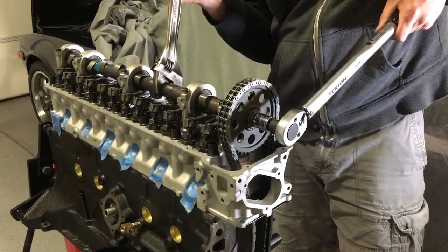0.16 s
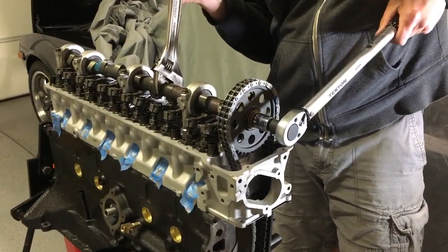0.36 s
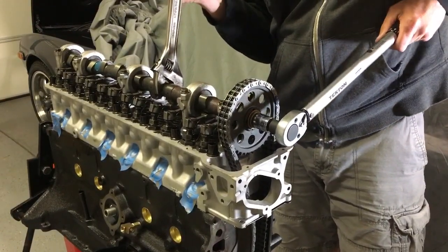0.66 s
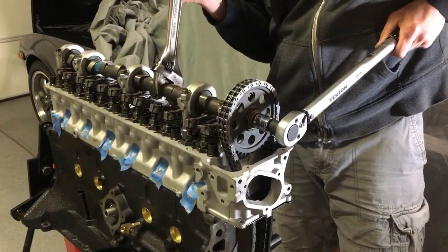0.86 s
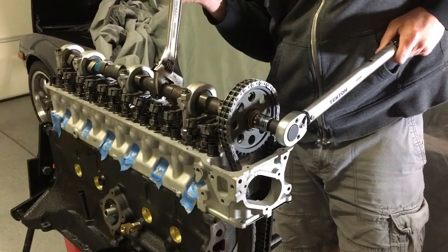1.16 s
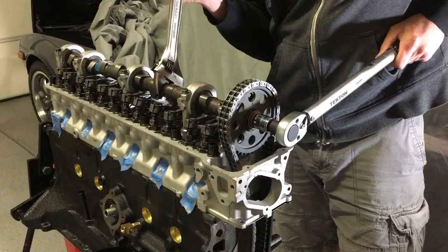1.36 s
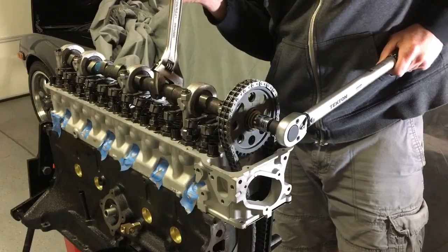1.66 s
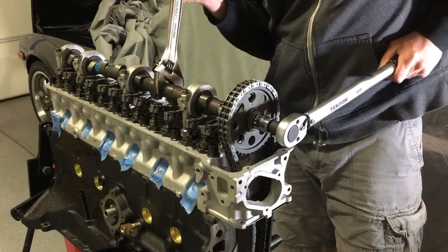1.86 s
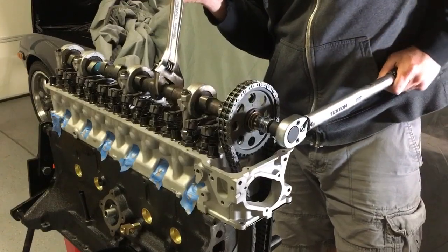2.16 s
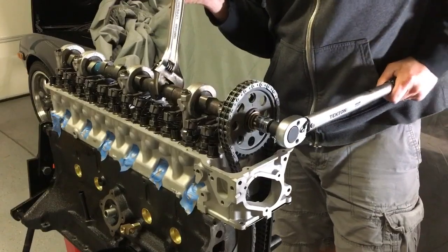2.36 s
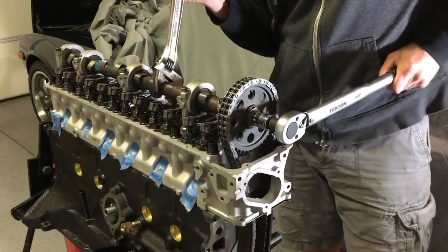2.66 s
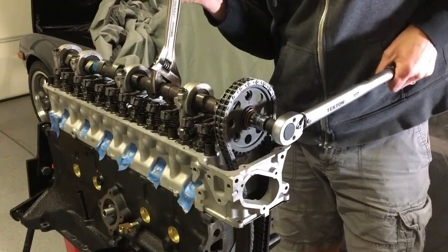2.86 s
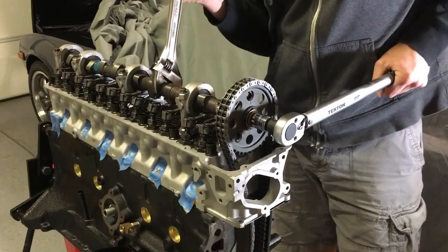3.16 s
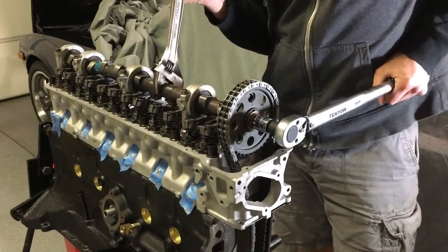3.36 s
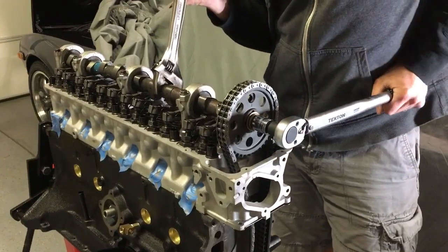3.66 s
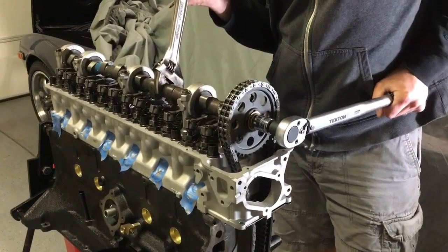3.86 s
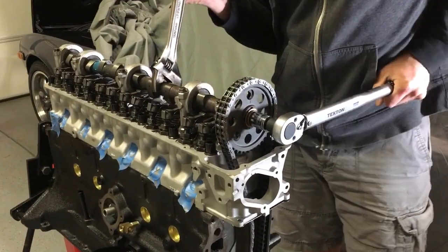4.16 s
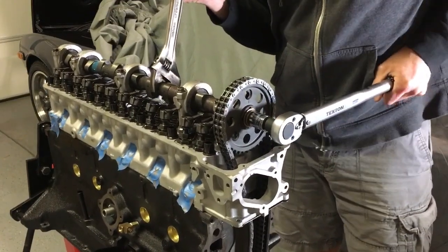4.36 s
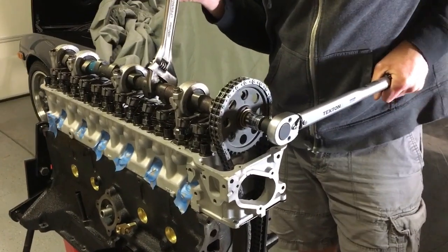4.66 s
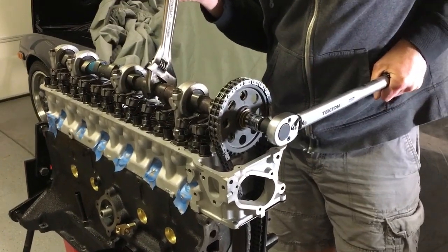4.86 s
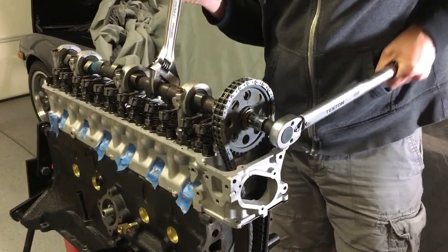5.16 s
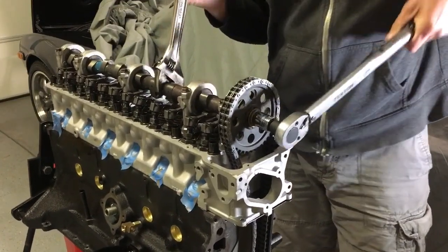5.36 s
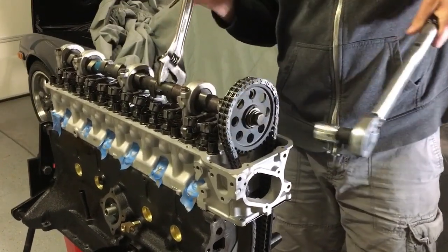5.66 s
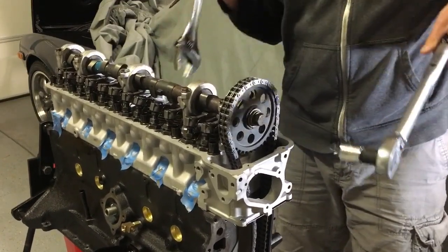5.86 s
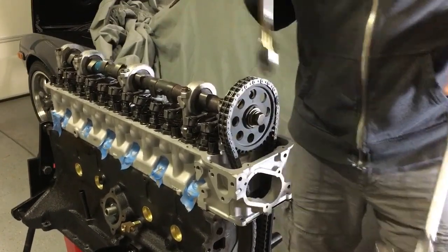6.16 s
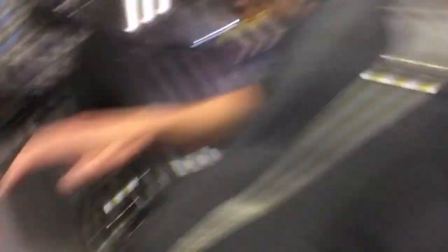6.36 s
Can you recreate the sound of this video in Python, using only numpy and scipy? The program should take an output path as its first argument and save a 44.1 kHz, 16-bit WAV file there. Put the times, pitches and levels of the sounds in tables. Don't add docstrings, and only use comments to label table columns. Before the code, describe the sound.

A quiet, hard-walled workshop heard by a close microphone: faint low mains hum, soft hiss and deep air rumble. From 0 to 2.1 s only tiny dull knocks, ticks, creaks and light sleeve rubs of tools under load. At 2.26 s a torque wrench snaps over: an extremely loud, bright, clipped steel crack with quick echoes and roughly half a second of metallic room ring. A small knock at 2.45 s leads to a slightly softer, ringing reset click at 2.65 s. Quiet again, until a short clear spanner slip at 3.67 s, the second huge crack at 3.82 s and its reset at 4.13 s. Faint dragging follows around 4.5-4.9 s. From 5.2 to 5.8 s socket and spanner come off with scuffs, scrapes, rustling cloth and small bright clinks. At 6.26 s the sound dips momentarily; soft low thumps and a strong pressure bump on the microphone at 6.47 s finish it.

```python
import sys
import numpy as np
from scipy import signal
from scipy.fft import rfft, irfft
from scipy.io import wavfile

SR = 44100
rng = np.random.default_rng(int(sys.argv[2]) if len(sys.argv) > 2 else 0)


def rack_gain(trim_db):
    fader = np.asarray(trim_db, float)
    return 10 ** (fader / 20)


def materialize(psi):
    bounded = np.clip(np.atleast_2d(psi).T, -1, 1)
    quanta = np.round(bounded * 32767).astype(np.int16)
    wavfile.write(sys.argv[1], SR, quanta)


N = 286806
TIME = np.arange(N) / SR


def noise(n=N):
    return rng.standard_normal(n)


def filtered(x, order, hz, kind="low"):
    return signal.sosfilt(signal.butter(order, hz, kind, fs=SR, output="sos"), x)


def at_hz(points, hz):
    points = np.array(points)
    return np.interp(np.log(hz + 1), np.log(points[:, 0]), points[:, 1])


def rms_one(x):
    return x / np.sqrt(np.mean(x ** 2) + 1e-20)


def peak_one(x):
    return x / np.abs(x).max()


def energy_one(x):
    return x / np.sqrt(np.sum(x ** 2))


def colour(x, spectrum, size=16384):
    cepstrum = irfft(np.log(rack_gain(at_hz(spectrum, np.arange(size // 2 + 1) * SR / size))))
    cepstrum[1:size // 2] *= 2
    cepstrum[size // 2 + 1:] = 0
    response = irfft(np.exp(rfft(cepstrum)))
    return signal.fftconvolve(x, response)[:len(x)]


def ring(clicks, hz, t60):
    r, w = rack_gain(-60 / (t60 * SR)), 2 * np.pi * hz / SR
    return signal.lfilter([0, np.sin(w)], [1, -2 * r * np.cos(w), r * r], clicks + 1e-18)


def struck(modes, levels_db, spread):
    blow = 1. * (np.arange(SR // 2) == 0)
    wide = np.minimum(np.array(modes)[:, :1] / 2500, 1)
    detune = 1 + spread * wide * rng.uniform(-1, 1, (len(modes), 4))
    out = 0
    for (hz, db, t60), more_db, factors in zip(modes, levels_db, detune):
        group = sum(ring(blow, hz * d, t60 * (2 * d - 1) ** 20) for d in factors)
        out = out + rack_gain(db + more_db) * group
    return out


def drift(rate):
    r = np.exp(-80 * np.pi * rate / SR)
    slow = signal.lfilter([1], [1, -2 * r, r * r], noise(N // 40 + 4002))[4000:]
    return np.interp(np.arange(N) / 40, np.arange(len(slow)), rms_one(slow))


def strokes(rows, rest_db=-110):
    levels_db = [db - 10 * np.where(TIME < s, (s - TIME) / rise, (TIME - s) / fall)
                 for s, db, rise, fall in rows]
    return rack_gain(np.maximum(rest_db, np.max(levels_db, axis=0)))


def add(out, s, sound):
    i = round(s * SR)
    out[i:i + len(sound)] += sound[:N - i]


# (frequency [Hz], level [dB])
PORT_RESPONSE = [(7600, 0), (8800, 0), (10000, 0), (11300, 4), (13000, -3), (14800, -3), (15650, 6.5),
                 (16300, -6)]


def snaps(events, spectra, modes, lines, rise_s, rattle_s, ring_db, crack_hz, send_db):
    out, t = np.zeros((2, N)), np.arange(SR // 2) / SR
    click = 1. * (t == 0)
    swell = 1 - np.exp(-(t / .0006) ** 2)
    for (s, db, *echoes_db), spectrum in zip(events, spectra):
        body = rack_gain(ring_db) * energy_one(struck(modes, np.zeros(len(modes)), spread=0.013))
        clear = sum(rack_gain(line_db - 20) * ring(click, hz, t60) for hz, line_db, t60 in lines)
        shape = (1 - np.exp(-(t / rise_s) ** 2)) * np.exp(-t / rattle_s)
        crack = colour(shape * noise(len(t)), spectrum)
        crack = filtered(crack, 2, crack_hz, "high")
        direct = rack_gain(db) * (peak_one(crack) + swell * (3.0 * body + clear))
        add(out[0], s - rise_s, direct)
        dull = filtered(direct, 2, 8000)
        for lag_s, echo_db in zip((.0057, .0082, .0168), echoes_db + [-10]):
            add(out[0], s - rise_s + lag_s, rack_gain(echo_db) * dull)
        whole = energy_one(colour(click, spectrum)) + body
        add(out[1], s, rack_gain(db + send_db) * whole)
    return np.array([colour(x, PORT_RESPONSE) for x in out])


# (time [s], peak [dB], first echo [dB], second echo [dB])
BREAKS = [
    (2.2582, 5, -6, -4),
    (3.8189, 5, -3, -7),
]
# (frequency [Hz], level [dB per Hz])
CLICK_SPECTRA = [
    [(88, -64.5), (150, -38), (226, -16), (345, 1.5), (470, -17), (600, -11), (760, -18), (1000, -9),
     (1270, -11), (1490, -10), (1640, -17), (3000, -8), (3600, -6), (4050, 2), (4400, -1), (4830, -5.5),
     (7150, -4.5), (9790, -12.5), (16300, -26.5)],
    [(88, -55.5), (150, -28), (292, -9), (516, -15.5), (967, -7), (1250, -11), (1520, -6), (1740, -11.5),
     (2300, -12), (2700, -6), (3500, -7), (4150, 0), (4800, -6), (6480, -6.5), (7150, -3), (7890, -9),
     (16300, -25.5)],
    [(88, -66.5), (150, -40), (270, -7), (516, -24.5), (581, -9), (640, -24), (948, -12), (1070, -23.5),
     (1150, -18.5), (1450, -8), (1900, -17), (3300, -13), (3700, -7), (4150, -4), (4600, -10), (5020, -10),
     (8500, -12), (16300, -32)],
    [(88, -66), (150, -39), (290, -8), (506, -19.5), (581, -5.5), (640, -20), (1000, -12), (1400, -5),
     (1800, -13), (2580, -12), (3300, -12), (3650, -6), (4200, -4), (4600, -8), (5020, -10.5), (7290, -8),
     (8040, -14), (16300, -34)],
]
# (frequency [Hz], level [dB], t60 [s])
BREAK_MODES = [(235, -22, .35), (340, -15, .18), (2560, -8, .15), (2960, -10, .15), (4020, -2, .12),
               (4150, -1, .2), (4330, -6, .08), (5430, -7, .05), (6300, -16, 0.3), (7550, -11, .1),
               (7110, -1.5, 0.2), (8750, -8, .07), (11210, -12, .04), (15600, -17, .1)]
# (frequency [Hz], level [dB], t60 [s])
BREAK_LINES = [(2660, -22, .3), (3000, -22, .3), (3997, -18, .3), (4128, -22, .5), (5640, -25, .3),
               (6288, -27, .7), (7120, -22, .3), (6960, -24, .3), (7890, -27, .3), (8850, -26, .2),
               (15700, -30, .15)]


def break_overs():
    return snaps(BREAKS, CLICK_SPECTRA[:2], BREAK_MODES, BREAK_LINES, rise_s=.0003, rattle_s=.0023,
                 ring_db=-7, crack_hz=2800, send_db=10.5)


# (time [s], peak [dB], first echo [dB], second echo [dB])
RESETS = [
    (2.6550, 2, -7, -8),
    (4.1333, 2.5, -5, -7),
]
# (frequency [Hz], level [dB], t60 [s])
RESET_MODES = [(230.9, -23.5, 0.36), (586, -18.5, 0.4), (1440, -3, .05), (3640, -3, .12), (4110, 1, .25),
               (3820, -4, .15), (4250, 0, 0.14), (4490, -4, .14), (5500, -9.5, 0.18), (7000, -9, .1),
               (7150, -3, .2), (7250, -3, .26), (10600, -11, 0.08)]
# (frequency [Hz], level [dB], t60 [s])
RESET_LINES = [(2760, -22, .4), (3580, -22, .3), (4230, -22, .4), (4340, -23, .4), (4460, -22, .5),
               (5604, -22, .35), (7170, -28, .5), (7270, -28, .5), (15500, -27, .15), (15720, -29, .15)]


def resets():
    return snaps(RESETS, CLICK_SPECTRA[2:], RESET_MODES, RESET_LINES, rise_s=.0004, rattle_s=.0019,
                 ring_db=-6, crack_hz=2000, send_db=11.5)


# (time [s], peak [dB], first echo [dB], second echo [dB])
SLIPS = [
    (3.6677, -11, -20, -12),
]
# (frequency [Hz], level [dB per Hz])
SLIP_SPECTRUM = [(88, -43), (150, -14), (612, -9), (850, -13), (1250, 0.5), (1980, -21.5), (2270, -13),
                 (2920, -1), (4300, -8), (5500, -18), (7920, -25), (9500, -29), (13000, -30), (16000, -38)]
# (frequency [Hz], level [dB], t60 [s])
SLIP_MODES = [(1020, -8, .1), (1180, -10, .1), (1300, -7, .08), (2335, -7, .3), (2550, -10, .1),
              (2879, -3, .08), (2970, -4, .2), (3650, -8, .08), (4100, -8, .08)]
# (frequency [Hz], level [dB], t60 [s])
SLIP_LINES = [(2341, -9, .45), (2540, -13, .3), (2963, -9, .35)]


def spanner_slip():
    return snaps(SLIPS, [SLIP_SPECTRUM], SLIP_MODES, SLIP_LINES, rise_s=.00003, rattle_s=.00005,
                 ring_db=-12, crack_hz=500, send_db=8.0)


def touches(events, modes, tick_db, ring_db):
    out, t = np.zeros(N), np.arange(SR // 2) / SR
    octaves = np.log2(np.array(modes)[:, 0] / 6000)
    for s, db, bright_db in events:
        tick = colour(np.exp(-t / .001) * noise(len(t)), RUSTLE_SPECTRUM)
        levels_db = bright_db * octaves + 2 * noise(len(modes))
        tone = struck(modes, levels_db, spread=0.016) * (1 - np.exp(-(t / .0003) ** 2))
        add(out, s, rack_gain(db - 7) * (rack_gain(ring_db) * peak_one(tone) + rack_gain(tick_db) * peak_one(tick)))
    return out


# (time [s], peak [dB], brightness [dB per octave])
SOCKET_TOUCHES = [
    (5.415, -23.5, 0),
    (5.468, -21, -1),
]
# (frequency [Hz], level [dB], t60 [s])
SOCKET_MODES = [(3770, -2, 0.21), (4160, 2, 0.063), (4700, 0.5, .03), (5500, -5, 0.04), (6400, -5, .2),
                (7500, -10, .2), (8500, -2, 0.025), (10300, -5, 0.068), (15000, -18, .1), (15700, -20, .1)]


def socket():
    return touches(SOCKET_TOUCHES, SOCKET_MODES, tick_db=1.5, ring_db=-7.5)


# (time [s], peak [dB], brightness [dB per octave])
SPANNER_TOUCHES = [
    (5.672, -24, -12),
    (5.758, -28.5, -9),
    (5.774, -33, -14),
    (5.792, -21.5, 2.5),
]
# (frequency [Hz], level [dB], t60 [s])
SPANNER_MODES = [(2950, -22, 0.04), (4150, -6, .03), (4500, -2, 0.07), (6210, 10, 0.012), (7000, -7, 0.12),
                 (9700, -6, 0.06), (12200, -16, .04), (14100, -11, 0.05)]


def spanner():
    return touches(SPANNER_TOUCHES, SPANNER_MODES, tick_db=-4, ring_db=-2.5)


def bursts(events, burst_s, gain_db, order):
    out, t = np.zeros(N), np.arange(SR // 6) / SR
    for s, db, hz, width in events:
        contact = np.exp(-t / burst_s) * noise(len(t))
        edge = 1 + np.clip(width, .03, 3) / 2
        sound = filtered(contact, order, [hz / edge, hz * edge], "band")
        sound = filtered(sound, 2, min(3.0 * hz, .45 * SR))
        add(out, s, rack_gain(db + gain_db) * peak_one(sound))
    return out


# (time [s], peak [dB], centre [Hz], width [centres])
KNOCKS = [(0.039, -55, 1700, 0.4), (0.091, -45, 2390, 0.89), (0.483, -55, 2200, .5),
          (0.507, -51, 1700, .35), (.512, -54, 700, .8), (0.565, -46.5, 1530, 0.96),
          (0.625, -47, 1700, 0.4), (0.659, -63, 1940, 0.67), (0.891, -50, 1650, 0.15),
          (0.969, -52, 1600, 0.3), (1.595, -53, 1600, 0.27), (1.683, -50.5, 1731, 0.15),
          (1.769, -43.5, 2400, 0.15), (1.771, -49, 1600, .2), (1.819, -50.5, 850, 0.4),
          (1.858, -55.5, 904, 0.52), (2.052, -52, 1500, 0.3), (2.058, -50, 2400, .15),
          (2.449, -28, 1520, 0.25), (2.468, -35, 1600, .4), (3.579, -51.5, 1990, 0.4),
          (5.12, -53.5, 970, 0.65), (5.231, -44, 838, 0.48), (5.251, -34, 2600, 0.9),
          (5.289, -37, 1240, 0.58), (5.416, -37.5, 1180, 1), (5.439, -38, 2750, 0.18),
          (5.654, -42, 971, 0.2), (5.696, -44, 948.5, 0.16), (5.729, -47, 900, 0.15),
          (5.773, -41, 3020, 0.4), (5.757, -42, 1550, .08), (5.78, -44, 950, .3), (5.808, -44, 1570, .08)]


def dull_knocks():
    return bursts(KNOCKS, burst_s=.0014, gain_db=-3, order=1)


# (time [s], peak [dB], centre [Hz], width [centres])
TICKS = [(.090, -62, 5000, 1.2), (.566, -50, 3300, .5), (.567, -60, 6500, .3), (.62, -63, 4900, 1.1),
         (1.770, -51, 4200, 0.2), (1.84, -56, 5200, .2), (2.057, -52.5, 5000, .12), (2.467, -31, 5500, .8),
         (2.467, -34, 8600, .3), (2.468, -40, 12500, .5), (2.882, -54, 10840, 1.1), (3.756, -31, 6500, .9),
         (5.12, -56, 2500, 1.2), (5.153, -52, 2500, 1.1), (5.232, -46, 5400, .15), (5.250, -33, 5200, .6),
         (5.469, -31, 5500, .08), (5.471, -34, 4300, .5), (2.2572, -26, 6000, .8), (2.6525, -42, 7000, .8),
         (3.818, -28, 6000, .8), (6.3, -58, 3000, .6), (5.241, -50, 1000, .3), (5.695, -38, 930, 0.2),
         (5.774, -38, 5000, .2), (5.251, -48, 15040, 0.06), (5.270, -42, 7000, .5), (5.278, -45, 8000, .3),
         (5.254, -46, 8500, .4), (5.356, -56, 9000, .4), (5.404, -56, 7000, .4), (5.422, -42, 3900, .15),
         (5.438, -56, 15200, .1), (5.653, -47, 3900, .3), (5.668, -45, 4000, .7), (3.613, -58, 7500, .6),
         (4.114, -56, 11000, .5), (5.384, -57, 13500, .3)]


def sharp_ticks():
    return bursts(TICKS, burst_s=.0005, gain_db=-1.5, order=2)


# (time [s], peak [dB], centre [Hz], width [centres])
THUMPS = [(.10, -57, 250, .9), (.62, -52.5, 245, 0.31), (1.01, -59, 380, 0.68), (1.15, -63, 332, 0.17),
          (2.06, -57, 245, 0.36), (2.573, -38, 250, .6), (2.575, -46, 550, .6), (2.60, -44, 230, 0.6),
          (5.30, -44.5, 258.5, .9), (5.625, -45.5, 300, 1.4), (5.906, -45, 240, 0.4), (5.905, -46, 125, .5),
          (5.80, -50, 190, .6), (3.3, -54, 200, .3), (6.296, -41.5, 218.5, 0.32), (6.34, -37, 226, .25),
          (6.38, -38, 235, 0.3), (6.401, -33, 215, 0.18), (6.425, -46, 520, .3), (6.447, -45, 550, 0.44)]
# (time [s], peak [dB], centre [Hz], width [centres])
JOLTS = [
    (3.668, -42, 170, .8),
    (3.819, -35, 90, 1.2),
    (4.134, -42, 130, .8),
]


def thumps():
    return (bursts(THUMPS, burst_s=.01, gain_db=-4.5, order=2)
            + bursts(JOLTS, burst_s=.007, gain_db=-4.0, order=2))


# (peak time [s], level [dB], time to gain 10 dB [s], to lose 10 dB [s])
DRAGS = [
    (3.12, -78, .06, .07),
    (4.555, -76, .015, .04),
    (4.74, -71, .015, .12),
    (4.9, -78, .1, .12),
]
# (frequency [Hz], level [dB], t60 [s])
SLACK_MODES = [(1230, -5, .03), (2060, 1, .015), (3700, 1, .008), (5050, -1, .012), (6310, -4, .008),
               (2600, 8, .002), (5000, 3, .0015)]


def drag():
    grains = strokes(DRAGS) * noise() * rack_gain(2.65 * rng.exponential(1, N))
    return rack_gain(-17) * sum(rack_gain(db) * ring(grains, hz, t60) for hz, db, t60 in SLACK_MODES)


# (peak time [s], level [dB], time to gain 10 dB [s], to lose 10 dB [s])
SCRAPES = [
    (.62, -72, .1, .07),
    (.96, -76, .1, .08),
    (1.82, -70, .06, .08),
    (2.07, -68, .01, .1),
    (5.27, -63, .02, .12),
    (5.46, -62, .05, .1),
    (5.79, -59.5, .14, .15),
]


def scrape():
    grains = noise() * rack_gain(3.0 * rng.exponential(1, N))
    return strokes(SCRAPES) * rack_gain(2.5 * drift(30)) * rms_one(filtered(grains, 2, [1000, 2300], "band"))


# (peak time [s], level [dB], time to gain 10 dB [s], to lose 10 dB [s])
RUBS = [(.1, -74, .15, .1), (.6, -74, .2, .2), (.93, -63, .13, .12), (1.29, -71, .12, .2),
        (1.55, -77, .2, .2), (1.85, -76, .2, .15), (3.65, -63, .15, .06), (5.26, -64, .12, .08),
        (5.45, -55, .05, .09), (5.8, -58.5, .2, .15), (6.365, -67, .05, .03), (6.44, -65, .04, .05)]
# (peak time [s], level [dB], time to gain 10 dB [s], to lose 10 dB [s])
GRIPS = [(1.7, -68, .05, .3), (1.88, -66, .2, .03), (2.058, -67, .02, .12), (5.252, -53, .05, .14),
         (5.72, -52, .08, .04), (4.92, -66, .2, .15), (3.3, -68, .2, .3), (5.9, -60, .15, .1),
         (6.15, -63, .15, .1), (6.304, -55, .015, .015), (6.35, -58, .015, .015), (6.406, -59, .02, .04),
         (6.45, -55, .03, .02)]
# (frequency [Hz], level [dB per Hz])
RUSTLE_SPECTRUM = [(700, -18), (1500, -4), (2600, -7), (4000, -1), (5500, -1), (7500, -10), (11000, -18),
                   (15000, -27)]


def jacket():
    grains = noise() * rack_gain(1.5 * rng.exponential(1, N))
    rustle = strokes(RUBS, rest_db=-83) * rack_gain(0.64 * drift(19)) * rms_one(colour(grains, RUSTLE_SPECTRUM))
    scuff = filtered(filtered(noise(), 1, [150, 500], "band"), 2, 700)
    return rustle + strokes(GRIPS) * rack_gain(-7 + 4.3 * drift(17)) * rms_one(scuff)


# (time [s], peak [dB], half width [s])
GRABS = [
    (6.35, -23, 0.029),
    (6.392, -26, .018),
    (6.471, -7.5, .0155),
]
# (time [s], peak [dB], half width [s])
PULLS = [
    (6.308, -29, .012),
    (6.512, -15, .008),
]


def camera_grab():
    def pulses(rows):
        return sum(rack_gain(db) * np.exp(-.5 * ((TIME - s) / half_s) ** 2) for s, db, half_s in rows)
    return pulses(GRABS) - pulses(PULLS)


# (frequency [Hz], t60 [s])
ROOM_T60 = [(200, 0.49), (530, 0.41), (1390, 0.48), (3680, 0.49), (7000, .36), (10500, .3), (15000, 0.24)]


def workshop(x):
    t, tail = np.arange(SR) / SR, 0
    edges_hz = 120 * 2 ** np.arange(0, 7.6, .5)
    for low, high in zip(edges_hz, edges_hz[1:]):
        band = filtered(noise(SR), 2, [low, high], "band")
        tail = tail + band * rack_gain(-60 * t / at_hz(ROOM_T60, np.sqrt(low * high)))
    tail = tail * (1 - np.exp(-(t / .002) ** 2))
    return rack_gain(-4) * signal.fftconvolve(x, energy_one(tail))[:N]


def stand():
    hz, lag_s, half_s = 47, .11, .05
    return sum(rack_gain(-50) * np.sqrt(2) * np.exp(-.5 * ((TIME - s - lag_s) / half_s) ** 2)
               * np.sin(2 * np.pi * hz * (TIME - s)) for s, *_ in BREAKS + RESETS)


# (frequency [Hz], level [dB])
HUM = [
    (120, -2.5),
    (240, -18),
    (360, -23),
]


def mains_hum():
    duck = sum((TIME > s) * np.exp(-np.abs(TIME - s) / .15) for s, *_ in BREAKS + RESETS)
    hum = sum(np.sqrt(2) * rack_gain(db) * np.sin(2 * np.pi * hz * TIME) for hz, db in HUM)
    return rack_gain(-66 - 8 * duck + 1.2 * drift(4.0)) * hum


# (peak time [s], level [dB], time to gain 10 dB [s], to lose 10 dB [s])
SHOVES = [
    (.001, -52, .02, .03),
    (2.66, -56, .06, .05),
    (2.88, -60, .06, .06),
    (3.82, -50, .02, .03),
    (4.14, -58, .04, .05),
    (5.7, -58, .05, .04),
    (5.9, -53, .15, .2),
    (6.3, -43, .02, .1),
    (6.5, -33, .06, .05),
]


def rumble():
    return strokes(SHOVES, rest_db=-67) * rack_gain(-4.5) * rms_one(filtered(noise(), 2, [38, 85], "band"))


# (time [s], level [dB])
SWAY = [(0.0, -41), (0.08, -35), (1.1, -43), (1.19, -36), (1.49, -51), (1.77, -38), (2.17, -56),
        (2.36, -42), (3.14, -49), (3.4, -35), (4.16, -46), (4.31, -39), (5.21, -31), (5.95, -38),
        (6.08, -50), (6.2, -41)]


def air_sway():
    sway_db = np.interp(TIME, *np.transpose(SWAY))
    hz = 6.8 * (1 + 0.068 * drift(1.5))
    sway = np.sqrt(2) * np.sin(2 * np.pi * np.cumsum(hz) / SR - .8)
    swell = filtered(noise(), 2, [10, 30], "band")
    return rack_gain(sway_db) * sway + rack_gain(-58) * rms_one(swell)


# (frequency [Hz], level [dB per Hz])
FLOOR_SPECTRUM = [(26, -8), (48, -16), (65, -16), (133, -18), (170, -26), (394, -31), (480, -33),
                  (661, -38), (5240, -43), (14400, -53), (16300, -62)]


def floor_noise():
    return rack_gain(-63) * rms_one(colour(noise(), FLOOR_SPECTRUM))


def dropout():
    start_s, back_s, edge_s = 6.264, 6.264 + .021, .008
    gap = np.clip(np.minimum(TIME - start_s, back_s - TIME) / edge_s + 1, 0, 1)
    return rack_gain(-15 * gap + 1.5 * (TIME > back_s) * np.exp(-np.abs(TIME - back_s) / .1))


def scene():
    near, sent = break_overs() + resets() + spanner_slip()
    near = filtered(near, 5, 200, "high")
    sent = filtered(sent, 5, 205, "high")
    dull, sharp, soft_blows = dull_knocks(), sharp_ticks(), thumps()
    steel = socket() + spanner() + drag()
    room = workshop(sent + rack_gain(4) * dull + rack_gain(-4) * sharp + rack_gain(-4.5) * steel + rack_gain(-6.5) * soft_blows)
    creep = rack_gain(.72 * np.minimum(TIME, 5.0))
    soft = dropout() * (creep * room + floor_noise() + jacket() + scrape())
    soft = signal.sosfilt(signal.ellip(12, .5, 60, 15800, fs=SR, output="sos"), soft)
    low = air_sway() + rumble() + mains_hum() + camera_grab() + stand()
    return (near + dull + sharp + steel + soft_blows + soft + low)[None]


def top_cut(x):
    return signal.sosfilt(signal.butter(12, 16450, fs=SR, output="sos"), x)


def record(dry):
    mix = np.clip(dry, -1, 1)
    return top_cut(mix)


dry = scene()
out = record(dry)
materialize(out)
```